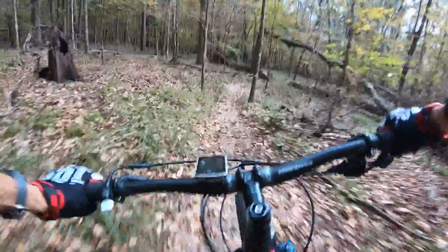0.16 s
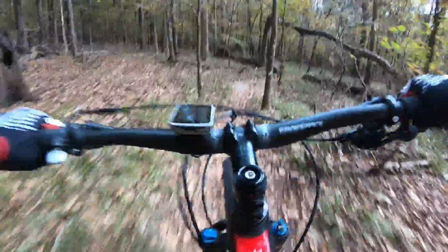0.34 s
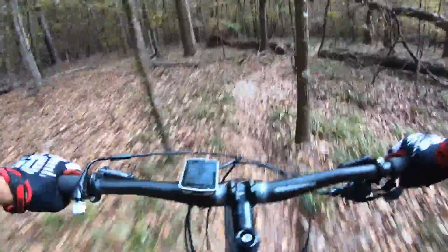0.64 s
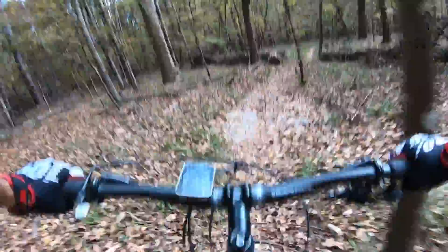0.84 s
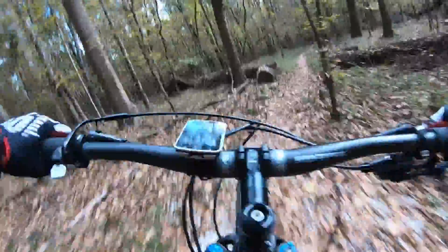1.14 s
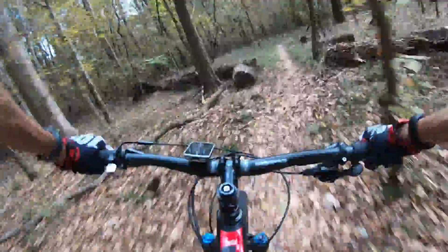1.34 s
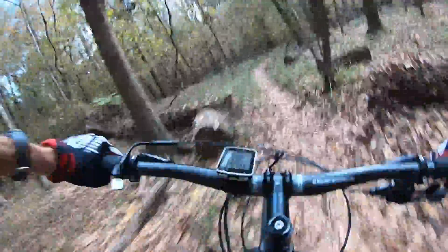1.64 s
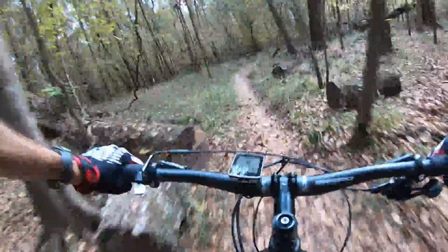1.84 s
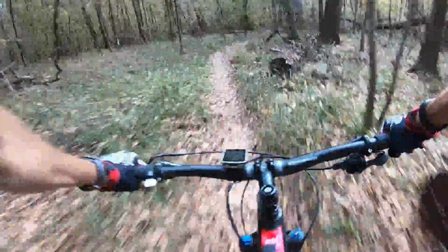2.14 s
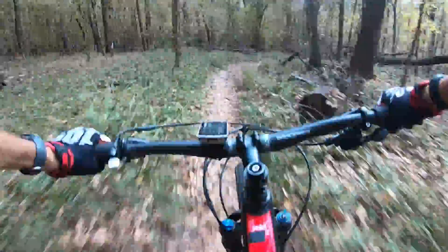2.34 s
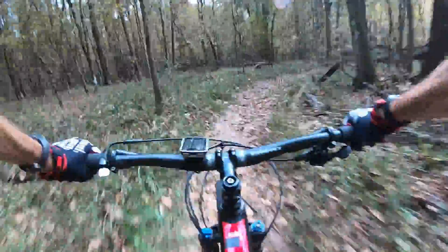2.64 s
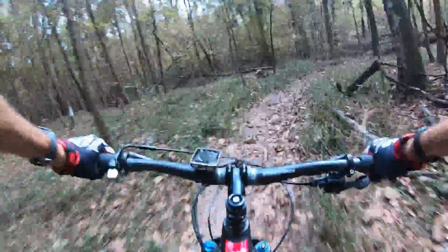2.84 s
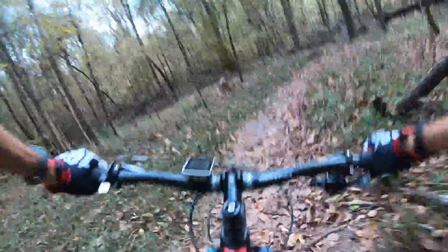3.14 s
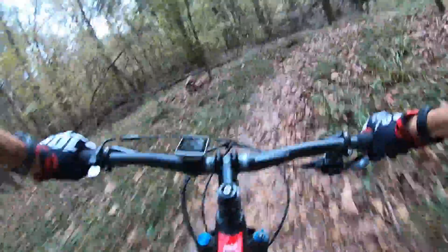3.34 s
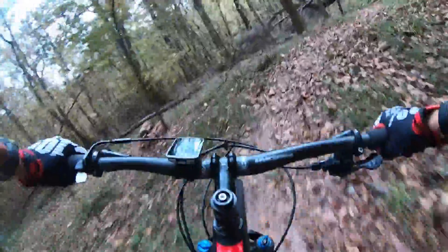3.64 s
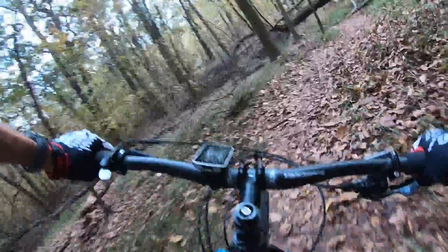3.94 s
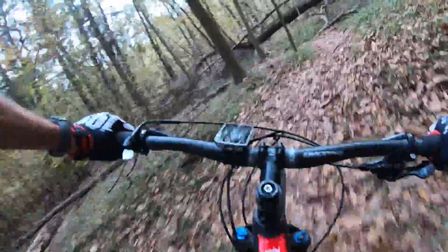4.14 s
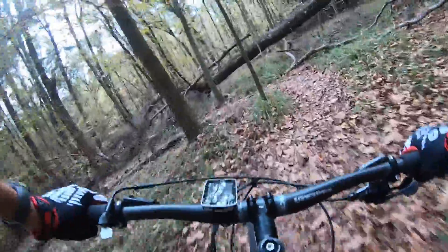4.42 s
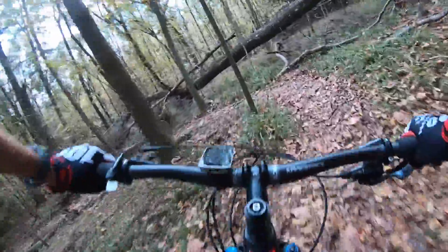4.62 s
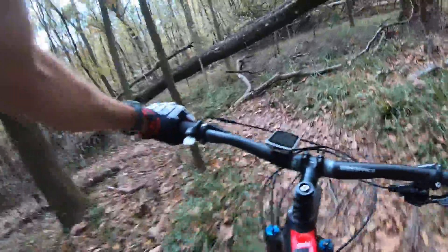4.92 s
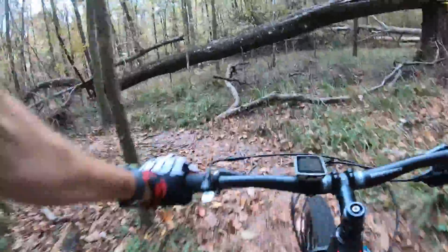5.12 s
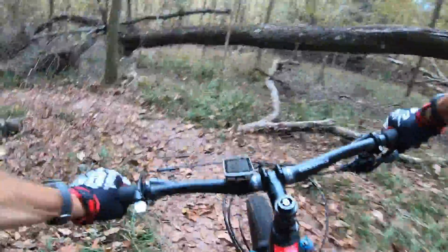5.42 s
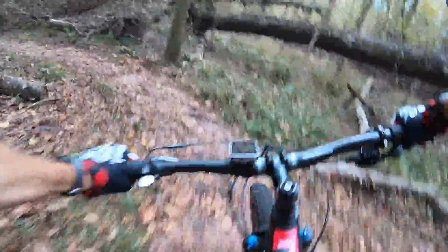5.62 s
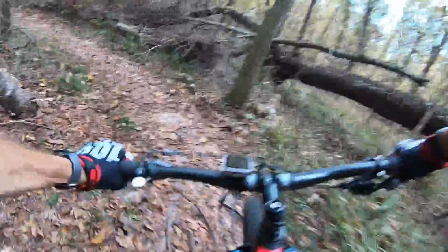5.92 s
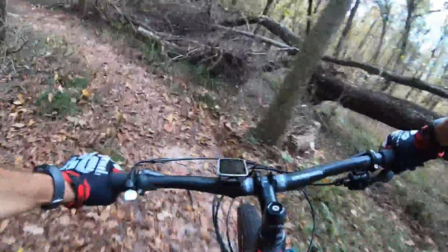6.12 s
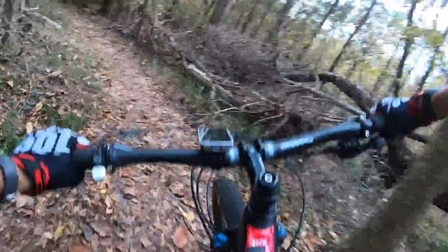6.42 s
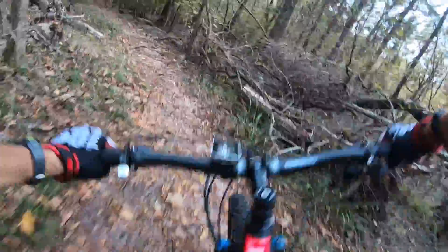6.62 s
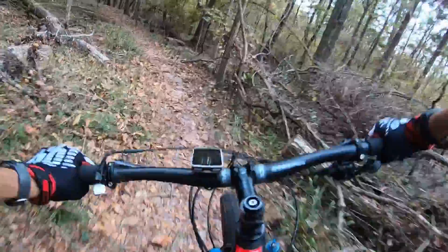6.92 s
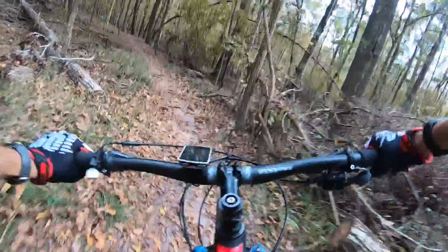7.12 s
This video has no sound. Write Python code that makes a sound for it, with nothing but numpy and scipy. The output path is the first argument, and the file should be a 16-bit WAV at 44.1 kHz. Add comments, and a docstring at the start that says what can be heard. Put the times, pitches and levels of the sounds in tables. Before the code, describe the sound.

Outdoors on a forest trail, heard very close from a rider's chest through a covered, treble-dulled microphone. From 0 s deep fluttering wind and boomy tyre rumble run together with crunching grit and crackling dry leaves. A hard frame clack and low thud land at 0.5 s, a jolt at 0.7, then wind peaks around 1.1 s with another clack, twig snaps, chain clatter and short fork hisses. From 1.4 to 2.3 s it is leafier and steadier, with a faint wheel whirr. Knocks, rattles and flicked sticks cluster from 2.8 to 3.9 s. Around the bend, 4 to 5.4 s, wind fades and leaf rustle stands out, with brief rough tyre hums and a sharp twig snap at 4.7. At 5.5 to 6.1 s low buffeting surges with violent clacks and jolts. Then lighter rolling, small stick and chain ticks, a soft low surge at 6.8, and wind rising slightly to 7.3 s.

```python
"""Wind buffets the microphone and tyres rumble from the start, as a mountain bike runs fast down a leafy forest trail.
It is heard from a camera on the rider's chest. Random tiny fractures make the crunch of grit and dry leaves.
Ringing bursts make twig cracks and chain clatter; decaying tones make sticks, jolts and the ring of the frame.
Filtered noise makes the wind and the hiss of the fork. Fine ticks make the wheel whirr, wobbling tones the tyre hums.
The wind eases around a bend, then returns with short surges of low buffeting and shaking."""
import sys
import numpy as np
from scipy import signal
from scipy.fft import rfft, irfft
from scipy.io import wavfile
from scipy.ndimage import uniform_filter1d

SR = 44100
rng = np.random.default_rng(int(sys.argv[2]) if len(sys.argv) > 2 else 0)


def wav_out(sig):
    """Save sig, one row per channel (or a flat mono array), as 16-bit PCM at SR to the path in sys.argv[1]."""
    wavfile.write(sys.argv[1], SR, np.round(np.clip(np.atleast_2d(sig).T, -1, 1) * 32767).astype(np.int16))


N = 320607
T = np.arange(N) / SR  # time of every sample, in s


def undb(db):
    """Turn decibels into a gain."""
    return 10 ** (np.asarray(db) / 20)


def unit(x):
    """Scale to rms 1."""
    return x / np.sqrt(np.mean(x ** 2) + 1e-18)


def curve(table):
    """Join rows of (time_s, value) into a curve in time."""
    time_s, value = np.transpose(table)
    return np.interp(T, time_s, value)


def arch(start_s, length_s):
    """A rounded rise from 0 to 1 and back."""
    turn = np.clip((T - start_s) / length_s, 0, 1)
    return np.sqrt(np.maximum(np.sin(np.pi * turn), 0))


def swells(table):
    """Add up one arch in dB for each row of (start_s, length_s, change_db)."""
    return sum(db * arch(start_s, length_s) for start_s, length_s, db in table)


def add(out, start_s, x):
    """Mix x into out at a time."""
    i = max(int(start_s * SR), 0)
    out[i:i + len(x)] += x[:max(N - i, 0)]


def colour(x, points, size=8192):
    """Filter with a spectrum given as (freq_hz, level_db), with no sound ahead of its cause."""
    hz, db = np.transpose(points)
    f = np.maximum(np.arange(size // 2 + 1) * SR / size, 1)
    log_gain = np.log(undb(np.interp(np.log(f), np.log(hz), db)))
    # folding the cepstrum gives the minimum-phase filter
    cepstrum = irfft(log_gain)
    cepstrum[1:size // 2] *= 2
    cepstrum[size // 2 + 1:] = 0
    impulse = irfft(np.exp(rfft(cepstrum)))
    return signal.fftconvolve(x, impulse)[:len(x)]


def ring(x, hz, width_hz):
    """One resonance, gain 1 at its centre."""
    return signal.lfilter(*signal.iirpeak(min(hz, SR / 3), hz / width_hz, fs=SR), x)


def walk(rate):
    """Smooth chance with spread 1 that changes about rate times a second."""
    k = max(int(SR / rate), 2)
    steps = np.repeat(rng.standard_normal(N // k + 1), k)
    return unit(uniform_filter1d(steps, k)[:N])


def grains(rate, spread_db, count=N):
    """Random tiny fractures, about rate a second, with sizes scattered in dB."""
    happens = rng.random(count) < rate / SR
    size = undb(spread_db * np.clip(rng.standard_normal(count), -3, 3))
    return unit(happens * size * rng.choice([-1, 1], count))


def crackle(spectrum, lo_hz, hi_hz, rate, spread_db, flicker_db, count=12):
    """Fragments of many sizes: each size ticks at its own pitch and comes in its own flurries."""
    out = 0
    for hz in np.geomspace(lo_hz, hi_hz, count):
        flurry = undb(flicker_db * (0.97 * walk(rate=70) + 0.095 * walk(rate=250)))
        out = out + ring(grains(rate, spread_db) * flurry, hz, hz / 5)
    return unit(colour(out, spectrum))


def bursts(table, spectrum, rate, spread_db, first_db, fall_s, ring_db, ring_width, gain_db,
           rise=0.059, size=6000):
    """Each row is one firm contact and a swarm of small ones that builds and dies away; all ring one resonance."""
    out, t = np.zeros(N), np.arange(size) / SR
    for start_s, length_s, db, hz in table:
        build = 1 - np.exp(-t / (rise * length_s))
        late = np.maximum(t - length_s, 0)
        die_away = np.exp(-late / min(fall_s, length_s) - .5 * t / length_s)
        contacts = grains(rate, spread_db, count=size) * build * die_away
        contacts[0] += undb(first_db)
        rung = ring(ring(contacts, hz, ring_width), hz, ring_width)
        x = unit(colour(contacts, spectrum, size=1024)) + undb(ring_db) * unit(rung)
        strength = np.sqrt(np.sum(x ** 2) / (length_s * SR))
        add(out, start_s, x * undb(db + gain_db) / strength)
    return out


# how strong each pitch of the tyre rumble is: freq_hz, level_db
RUMBLE_SPECTRUM = [(100, -15), (190, -4), (290, 1.5), (450, -1), (540, -11), (700, -15.5), (1500, -18.5),
                   (4000, -48.5)]
# notes at which the tyres boom: pitch_hz, width_hz, relative level_db
TYRE_MODES = [(234, 30, 0), (345, 70, -8), (450, 60, -7)]
# how strong each pitch of the grit is: freq_hz, level_db
GRIT_SPECTRUM = [(250, -5), (500, -13), (750, -6), (1050, -7.5), (1400, -3), (1750, 0.5), (2350, 0.5),
                 (2800, -5.5), (4000, -5.5), (7000, -18)]
# how strong each pitch of the dry leaves is: freq_hz, level_db
LEAF_SPECTRUM = [(700, -30.5), (1500, -9.5), (2100, -8), (3200, -8), (4000, -2), (5000, 1.5), (6200, 3),
                 (7000, -2.5), (9000, -2), (15000, -1)]


def tyres(rumble_db, grit_db, leaves_db):
    """Tyres boom at their modes on uneven ground; one shifting load drives tread, grit and leaves together."""
    load = .55 * walk(rate=45) + .8 * walk(rate=150)

    tread_hits = grains(rate=2500, spread_db=4.5) * undb(4.0 * load)
    tread = unit(colour(tread_hits, RUMBLE_SPECTRUM))
    bumps = grains(rate=1200, spread_db=3.5)
    boom = unit(sum(undb(db) * ring(bumps, hz, width) for hz, width, db in TYRE_MODES))
    rumble = unit(tread + boom)

    grit = crackle(GRIT_SPECTRUM, lo_hz=503, hi_hz=4210, rate=900, spread_db=2.0, flicker_db=5.0)
    grit = unit(grit * undb(2.57 * load))
    leaves = crackle(LEAF_SPECTRUM, lo_hz=1760, hi_hz=10780, rate=1600, spread_db=2.5, flicker_db=5.0)
    leaves = unit(leaves * undb(1.6 * load))
    return rumble * undb(rumble_db - 3.0) + grit * undb(grit_db - 1.0) + leaves * undb(leaves_db - 1.5)


# hard knocks of the frame: start_s, clack_peak_db, brightness_hz (treble limit), ring_hz (favoured pitch),
# tyre_bump_db, thud_db, thud_hz, after_ring_db
KNOCKS = [(0.5248, -7, 4020, 3000, -9.5, -6.5, 54, -34), (1.1801, -7, 3620, 2400, -33, -26, 50, -34),
          (2.32, -21, 1480, 1200, -17.5, -12, 204, -50), (2.8094, -9, 2550, 1800, -23, -28, 150, -44),
          (3.088, -21.5, 2210, 1600, -25, -38, 90, -49), (3.419, -12.5, 3180, 2700, -13, -26, 70, -38),
          (3.431, -11.5, 2480, 1250, -21, -16, 60, -32), (3.867, -18.5, 2490, 800, -24, -22, 89.5, -36),
          (5.682, -6.5, 4500, 3300, -9, -7.5, 54, -41), (5.8342, -7.5, 4600, 3500, -14.5, -2.5, 60, -42),
          (6.098, -9.5, 4760, 1350, -13, -16, 304, -25.5)]
# repeat contacts within a knock: typical delay_s after the start, level_db
CHATTER = [(0, 1), (.0006, -9), (.0016, -12), (.003, -17)]
# notes of the frame: pitch_hz, width_hz, level_db before each blow's own scatter
FRAME_MODES = [(420, 240, 4), (820, 220, 1), (1010, 100, -3), (1270, 220, 2), (1830, 340, 4),
               (2400, 420, 3), (2880, 340, 0), (3400, 320, 1), (4200, 550, 1)]


def knocks(tick_db=-25, scuff_db=-23.0, scuff_s=0.0021, scatter_db=8.0, favour_db=5, favour_octaves=.45,
           crack_s=0.00076, size=4000):
    """A hard, chattering contact rings the damped frame and jolts the camera; the tyre meets the root just before."""
    out, t = np.zeros(N), np.arange(size) / SR
    for start_s, peak_db, bright_hz, ring_hz, bump_db, thud_db, thud_hz, after_db in KNOCKS:
        blow = undb(scuff_db) * rng.standard_normal(size) * np.exp(-t / scuff_s)
        for delay_s, contact_db in CHATTER:
            blow[int(delay_s * SR * rng.uniform(.6, 1.4))] += undb(contact_db)

        # every blow lands elsewhere and favours the modes near its own ring
        clack = 0
        for k, (hz, width, mode_db) in enumerate(FRAME_MODES):
            near = np.exp(-(np.log2(hz / ring_hz) / favour_octaves) ** 2)
            level_db = mode_db + favour_db * near + scatter_db * rng.uniform(-1.3, 1)
            clack = clack + (-1) ** k * undb(level_db) * ring(blow, hz, width)
        crack = unit(rng.standard_normal(size) * np.exp(-t / crack_s))
        clack = clack + 2 * undb(-2) * np.std(clack) * crack
        dull = signal.butter(12, min(bright_hz, SR / 3), fs=SR, output="sos")
        clack = signal.sosfilt(dull, clack) + undb(tick_db) * blow

        add(out, start_s, clack / np.max(np.abs(clack)) * undb(peak_db))
        add(out, start_s, after_ring(t) * undb(after_db))
        add(out, start_s, thud(thud_hz, cycles=0.74) * undb(thud_db))
        add(out, start_s - 0.0018, thud(383, cycles=1.33) * undb(bump_db))  # the tyre bump
    return out


# notes of the bars and frame after a clack: typical pitch_hz, typical level_db, t60_s (time to fall 60 dB)
AFTER_RING = [(517, -1, .04), (926, -13, .04), (1680, 3, .045), (2169, -7, .04), (2700, -6, .04),
              (3510, -2, .035)]


def after_ring(t, detune=0.034, scatter_db=2):
    """The narrow metal modes die away, a little different after every blow."""
    out = 0
    chance = rng.standard_normal((len(AFTER_RING), 2))
    for (hz, db, t60), (pitch_chance, level_chance) in zip(AFTER_RING, chance):
        tone = np.sin(2 * np.pi * hz * (1 + detune * pitch_chance) * t)
        out = out + undb(db + scatter_db * level_chance) * tone * np.exp(-np.log(1000) * t / t60)
    return out


def thud(hz, cycles, size=4000):
    """A jolt is a sine that fades over the given number of cycles."""
    turns = hz * np.arange(size) / SR
    return np.sin(2 * np.pi * turns) * np.exp(-turns / cycles)


# jolts of the camera: start_s, level_db (before the fade), pitch_hz, fade_cycles
JOLTS = [(0.661, -4.5, 66.5, 0.91), (1.109, -6, 67.6, 0.44), (3.418, -6.5, 56.4, 0.61),
         (3.691, -7, 49.3, 0.54), (3.916, -10, 59, 0.76), (5.738, -5.5, 58, 0.6), (5.769, -8.5, 117, 2),
         (5.799, -8, 66, 0.76), (6.771, -8, 65, 0.53)]


def jolts():
    """Each jolt rocks the camera in a low tone that quickly fades."""
    out = np.zeros(N)
    for start_s, db, hz, cycles in JOLTS:
        add(out, start_s, thud(hz, cycles) * undb(db))
    return out


# how strong each pitch of the wind is: freq_hz, level_db
WIND_SPECTRUM = [(12, -25), (25, 0), (48, -1.5), (80, -5), (125, -7), (170, -16.5), (300, -28), (600, -34),
                 (1500, -84.5)]


def wind(db, brighten=0.64):
    """Eddies on the microphone port: a deep, uneven flutter that reaches higher as its level rises."""
    eddies = unit(colour(rng.standard_normal(N), WIND_SPECTRUM))
    swell = np.sqrt(uniform_filter1d(eddies ** 2, size=5000) + 1e-6)
    # the given level sets the strength over a moment; single eddies come and go within it
    eddies = eddies / swell * undb(db - 3.0 + 2.18 * walk(rate=60))
    low_pass = signal.butter(2, 100, fs=SR, output="sos")
    large = signal.sosfiltfilt(low_pass, eddies, padtype="even")
    return large + (eddies - large) * undb(brighten * (db + 20.5))


# twigs breaking: start_s, length_s, level_db (before a shared gain), ring_hz
TWIGS = [(0.834, 0.013, -32, 4670), (1.034, 0.0044, -40, 6100), (1.135, 0.0045, -19, 6160),
         (1.154, 0.0027, -19.5, 5870), (1.247, 0.008, -26.5, 6260), (1.27, 0.0025, -29, 6000),
         (3.019, 0.0025, -30.5, 5500), (3.179, 0.0042, -22.5, 3600), (3.344, 0.004, -39, 6000),
         (3.369, 0.0039, -25.5, 6200), (3.474, 0.015, -27, 5360), (3.654, 0.0028, -29, 6200),
         (4.7293, 0.0017, -18, 3860), (4.734, 0.015, -25, 3900), (5.021, 0.0065, -26, 6440),
         (5.273, 0.0021, -25, 5170), (5.432, 0.0026, -25.5, 5500), (5.454, 0.0043, -26, 4350),
         (6.338, 0.0028, -21.5, 4500), (6.666, 0.023, -38.5, 6000)]
# how strong each pitch of breaking wood is: freq_hz, level_db
WOOD_SPECTRUM = [(300, 0.5), (1000, -7), (2000, 6.5), (3300, 3), (4500, 5.5), (6500, 4.5), (12000, -0.5)]


def twigs(leaves_db):
    """A twig or leaf breaks with one firm snap and a swarm of small fractures."""
    breaks = np.vstack([TWIGS, leaf_snaps(leaves_db, over_db=-2.5, scatter_db=3.5)])
    return bursts(breaks, WOOD_SPECTRUM, rate=4400, spread_db=0.5, first_db=16.0, fall_s=0.0071,
                  ring_db=-9, ring_width=1300, gain_db=1.5)


def leaf_snaps(leaves_db, over_db, scatter_db, count=110):
    """Brittle leaves snap at random, following the rustle: rows of (start_s, length_s, level_db, ring_hz)."""
    when, length, size, pitch = rng.random((count, 4)).T
    db = leaves_db[(when * N).astype(int)] + over_db + scatter_db * size ** 2
    return np.transpose([when * N / SR, 0.00088 + 0.0096 * length, db, 2600 + 4400 * pitch])


# chain and cables shaken, from single ticks to long rattles:
# start_s, length_s, level_db (before a shared gain), ring_hz
CLATTER = [(0.428, 0.024, -31.5, 2680), (0.6175, 0.0064, -25, 2170), (0.977, 0.0027, -27, 1990),
           (1.108, 0.0044, -26, 1800), (1.125, 0.027, -29, 1470), (1.17, 0.0037, -31, 1200),
           (1.218, 0.021, -30.5, 1060), (1.244, 0.011, -30.5, 2360), (2.232, 0.0062, -28, 660),
           (2.315, 0.015, -29.5, 990), (2.392, 0.01, -25.5, 2780), (2.41, 0.022, -34.5, 2700),
           (2.765, 0.013, -29.5, 970), (3.232, 0.0044, -26, 2200), (3.307, 0.0079, -24.5, 3050),
           (3.365, 0.0064, -28, 1500), (3.411, 0.018, -27.5, 2730), (3.428, 0.021, -29.5, 1160),
           (3.552, 0.035, -34.5, 2960), (3.732, 0.013, -33.5, 1050), (3.853, 0.0064, -35, 600),
           (3.944, 0.032, -28.5, 694), (4.512, 0.011, -30, 1080), (4.533, 0.028, -31, 1120),
           (5.19, 0.026, -34.5, 805), (5.395, 0.0091, -26.5, 1440), (5.786, 0.0059, -29, 1860),
           (5.854, 0.0079, -30.5, 1840), (6.219, 0.0059, -39, 1680), (6.309, 0.008, -28.5, 2640),
           (6.356, 0.026, -37, 1200), (6.394, 0.014, -32.5, 1290), (6.53, 0.0031, -47, 2900),
           (6.753, 0.018, -34.5, 2250), (6.913, 0.003, -39.5, 2980), (6.948, 0.003, -40, 3440),
           (6.9745, 0.0026, -36, 3200), (7.002, 0.0029, -35.5, 3120), (7.108, 0.0035, -36.5, 3130),
           (7.131, 0.0025, -48, 2900), (7.163, 0.0099, -32, 4320), (7.19, 0.0075, -32, 2120),
           (7.207, 0.0052, -35, 1364)]
# how strong each pitch of the chain is: freq_hz, level_db
CHAIN_SPECTRUM = [(150, -19), (400, 5), (700, 2), (1200, 4), (2000, 5), (3000, 1.5), (4500, 1.5),
                  (6500, -4.5), (12000, -14.5)]


def clatter(grit_db):
    """A bump shakes chain and cables: one firm hit and a swarm of small contacts that ring."""
    rattles = small_rattles(grit_db, over_db=-11, scatter_db=1.0, length_s=0.005, lo_hz=670, hi_hz=3120)
    shakes = np.vstack([CLATTER, rattles])
    return bursts(shakes, CHAIN_SPECTRUM, rate=2000, spread_db=2.0, first_db=11.0, fall_s=0.033,
                  ring_db=-7.5, ring_width=520, gain_db=1.4)


def small_rattles(grit_db, over_db, scatter_db, length_s, lo_hz, hi_hz, count=24):
    """Random chain shakes, harder under load: rows of (start_s, length_s, level_db, ring_hz)."""
    when, length, size, pitch = rng.random((count, 4)).T
    db = grit_db[(when * N).astype(int)] + over_db + scatter_db * size ** 2
    return np.transpose([when * N / SR, length_s * (.5 + length), db, lo_hz * (hi_hz / lo_hz) ** pitch])


# loose sticks flicked by the tyres: start_s, level_db (before attack and decay), pitch_hz, decay_s
STICKS = [(1.18, -14.5, 1820, .003), (1.183, -19, 2450, .004), (1.2471, -13, 987, 0.0039),
          (3.089, -24, 850, .004), (3.3105, -24, 3150, .003), (3.4155, -16, 2930, .004),
          (3.4281, -16, 1080, 0.0054), (3.515, -23, 4330, .002), (4.513, -23, 1100, 0.0031),
          (4.575, -20.5, 1040, 0.0045), (5.291, -16, 1750, 0.0022), (6.3043, -15.5, 2670, 0.0025),
          (6.3145, -25, 4250, .004), (6.3966, -23, 1450, .003), (6.402, -21.5, 2130, .004),
          (7.208, -20, 1350, .003)]


def sticks(attack_s=0.0012, overtone=2.5, overtone_db=-11, size=3000):
    """A flicked stick rings for a few milliseconds at its first two bending modes."""
    out, t = np.zeros(N), np.arange(size) / SR
    for start_s, db, hz, decay_s in STICKS:
        phase = 2 * np.pi * hz * t
        tock = np.sin(phase) + undb(overtone_db) * np.sin(overtone * phase)
        shape = (1 - np.exp(-t / attack_s)) * np.exp(-t / decay_s)
        add(out, start_s, tock * shape * undb(db))
    return out


# quick strokes of the suspension fork: start_s, length_s, hiss_db
STROKES = [(0.468, 0.016, -40), (0.931, 0.03, -37), (1.078, 0.019, -28.5), (2.937, 0.031, -34.5),
           (3.11, 0.021, -32), (3.22, 0.017, -34.5), (3.285, 0.025, -30), (3.445, 0.034, -36)]


def fork(hz=7260, width_hz=3500):
    """Each quick stroke of the fork squirts oil through the damper: a short, high hiss."""
    noise = rng.standard_normal(N)
    jet = unit(ring(ring(noise, hz, width_hz), hz, width_hz))
    return jet * sum(arch(start_s, length_s) * undb(db) for start_s, length_s, db in STROKES)


# broad notes in the whirr of the running wheels: pitch_hz, width_hz, relative level_db (average)
WHIRR_BANDS = [(237, 34, 2), (968, 220, -8), (1840, 240, -1), (2060, 240, -.5), (3030, 700, -5.5)]
# loudness of the whirr before its flutter: time_s, level_db
WHIRR_LEVEL = [(0, -40), (.8, -40), (1.5, -49.5), (2.5, -35.5), (3.0, -47.5), (4.1, -44.5), (5.5, -46),
               (6.15, -50.5), (7.27, -54.5)]


def whirr(waver_db=1.3, flutter_db=0.5):
    """Hubs and chain run on under the crackle: dense fine ticks ring a few broad bands, each wavering slightly."""
    ticks = grains(rate=3600, spread_db=1.5)
    rung = 0
    for hz, width, db in WHIRR_BANDS:
        band = unit(ring(ring(ticks, hz, width), hz, width))
        rung = rung + undb(db + waver_db * walk(rate=12)) * band
    return unit(rung) * undb(curve(WHIRR_LEVEL) + flutter_db * walk(rate=30))


# two rough hums of the tyres in the bend, one sliding down, one a low boom:
# start_s, length_s, starting pitch_hz (before wobble), sag_hz_per_s (negative rises), level_db
TYRE_HUMS = [(3.94, 0.23, 505, 330, -44), (4.41, 0.23, 228, -50, -42)]


def tyre_hums():
    """Two rough hums of the tyres: sines with a sliding, wobbling pitch and a fluttering level."""
    out = 0
    for start_s, length_s, hz, sag, db in TYRE_HUMS:
        slide = hz - sag * np.clip(T - start_s, 0, length_s)
        pitch_hz = slide * (1 + .06 * walk(rate=130))
        flutter = unit(undb(4.5 * walk(rate=110)))
        tone = unit(np.sin(2 * np.pi * np.cumsum(pitch_hz) / SR))
        out = out + tone * flutter * arch(start_s, length_s) * undb(db)
    return out


# airflow over the microphone, before surges and trim: time_s, wind_db
AIRFLOW = [(0, -19.5), (.24, -18), (.4, -23.5), (.55, -18), (1.07, -15), (1.4, -18), (1.9, -23),
           (2.25, -20.5), (2.7, -19), (3.1, -20.5), (3.93, -21.5), (4.04, -28.5), (5.1, -37.5),
           (5.6, -28.5), (6.0, -25.5), (6.65, -33), (7.27, -25.5)]
# short surges of low buffeting and shaking on top of the airflow: start_s, length_s, rise_db
SURGES = [(5.52, 0.072, 8), (5.665, 0.049, 11), (5.735, 0.069, 12), (5.97, 0.11, 4), (6.75, 0.18, 10)]
# how hard the tyres work the ground, before heaves and trim: time_s, grit_db
EFFORT = [(0, -35.5), (.85, -40), (1.15, -31.5), (1.4, -40), (1.65, -40), (1.85, -37.5), (2.12, -37.5),
          (2.45, -34), (3.0, -36.5), (3.45, -34.5), (3.75, -41), (4.35, -41), (5.2, -36.5), (5.7, -35),
          (6.1, -43), (6.9, -43.5), (7.27, -39)]
# depth of the leaf litter, before trim: time_s, leaves_over_grit_db
LITTER = [(0, -3), (.7, -4), (.95, 3), (1.2, -1), (1.85, 5.5), (2.3, -4.5), (4.3, 3.5), (5.2, 3), (6.1, -1),
          (7.27, -1.5)]
# the bike presses into a dip (+) or goes light over a crest (-):
# start_s, length_s, load_change_db, further rumble_change_db
HEAVES = [(0.41, 0.074, 5, -1), (0.513, 0.062, -8, 9), (0.577, 0.11, 5, 6.5), (.97, 0.18, -2.5, 5.5),
          (1.286, 0.22, -0.5, 3.5), (1.436, 0.13, -6, -8), (1.852, 0.073, 1.5, -6), (1.99, 0.23, -2.5, -6),
          (2.362, 0.21, 2, -8.5), (2.522, 0.077, 6.5, -2), (3.542, 0.026, 6, 3), (3.767, 0.12, 0.5, -16),
          (4.5, 0.16, -1, 3.5), (4.723, 0.47, -1, -5.5), (5.122, 0.14, 4.5, 0.5), (5.304, 0.055, -5, -3),
          (5.383, 0.055, 5, -4), (5.512, 0.067, 4.5, -2), (5.78, 0.077, 3.5, 9), (5.843, 0.15, -0.5, 6),
          (6.11, 0.094, -7, 6), (6.235, 0.066, -6.5, 3.5), (6.298, 0.079, 4.5, 9.5), (6.48, 0.1, 4.5, -2.5),
          (6.752, 0.079, 2.5, 3), (6.842, 0.28, -3, 2), (7.06, 0.078, 4, 2.5)]


def ride(rumble_over_db=3, cruise_db=-23.5, rumble_per_air_db=0.1629, lumps_db=2.5):
    """Levels in dB of wind, rumble, grit and leaves: load drives the ground sounds, and rumble grows with buffeting."""
    heaves = np.array(HEAVES)
    wind_db = curve(AIRFLOW) + swells(SURGES)
    grit_db = curve(EFFORT) + swells(heaves[:, :3])
    rumble_db = grit_db + rumble_over_db + rumble_per_air_db * (wind_db - cruise_db)
    rumble_db = rumble_db + swells(heaves[:, [0, 1, 3]]) + lumps_db * walk(rate=20)
    leaves_db = grit_db + curve(LITTER)
    return wind_db, rumble_db, grit_db, leaves_db


def scene():
    """Add up tyres, bike, wood and wind, all close to the microphone."""
    wind_db, rumble_db, grit_db, leaves_db = ride()
    ground = tyres(rumble_db, grit_db, leaves_db) + twigs(leaves_db) + sticks() + tyre_hums()
    bike = knocks() + jolts() + clatter(grit_db) + fork() + whirr()
    return (ground + bike + wind(wind_db))[None]


# notes of the camera housing: pitch_hz, width_hz, level_db
HOUSING = [(965, 80, -4), (1680, 90, -11), (2020, 200, -2), (2804, 70, -7), (3180, 150, -6),
           (6050, 900, -10)]
# the covered microphone colours the middle and loses the treble: freq_hz, level_db
MIC_SPECTRUM = [(20, 0.5), (1150, 0), (1370, -4), (1600, -4.5), (2150, -5.5), (2330, -7.5), (2550, 0),
                (6400, 0.5), (7100, -1.5), (8000, -14.5), (10000, -28.5), (12000, -47), (15500, -89)]
# level of the faint bright sound mixed in beside the dulled sound: time_s, level_db
BRIGHT_LEVEL = [(0, -44), (1.2, -41), (2, -54), (4.8, -39), (5.5, -27), (6.3, -32), (6.7, -52), (7.27, -62)]


def record(dry):
    """The housing rings a little, the covered microphone dulls the treble, and the top is cut."""
    rings = sum(undb(db) * ring(dry[0], hz, width) for hz, width, db in HOUSING)
    housed = dry[0] + rings
    heard = colour(housed, MIC_SPECTRUM) + undb(curve(BRIGHT_LEVEL)) * housed
    top_cut = signal.ellip(8, .2, 70, 15700, fs=SR, output="sos")  # cut above 15700 Hz
    return signal.sosfilt(top_cut, heard)[None]


dry = scene()
out = record(dry)
wav_out(out)
```